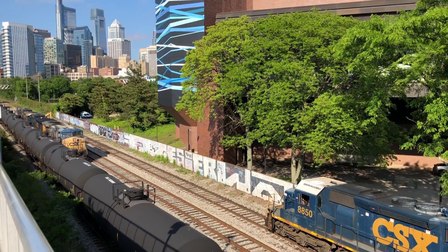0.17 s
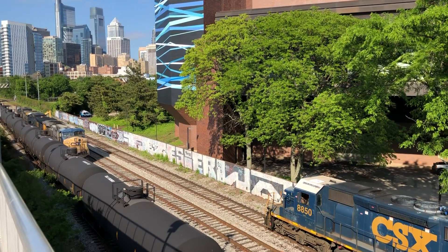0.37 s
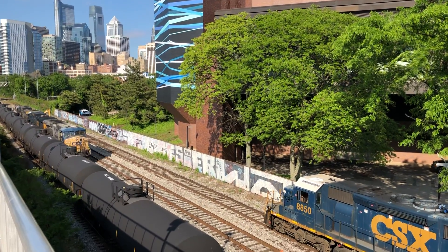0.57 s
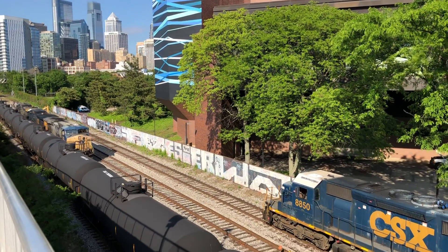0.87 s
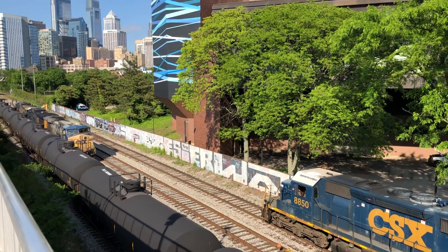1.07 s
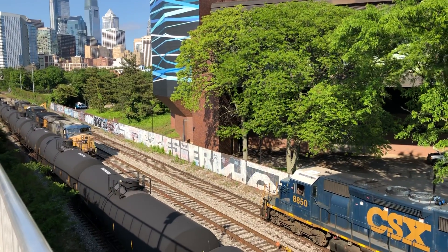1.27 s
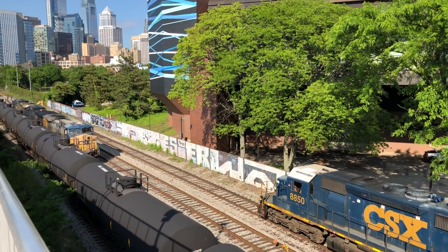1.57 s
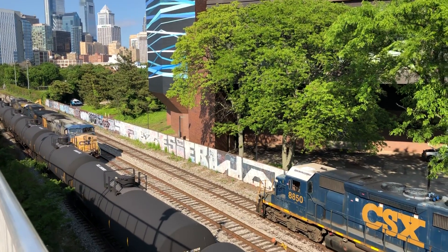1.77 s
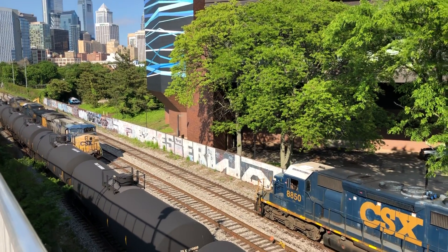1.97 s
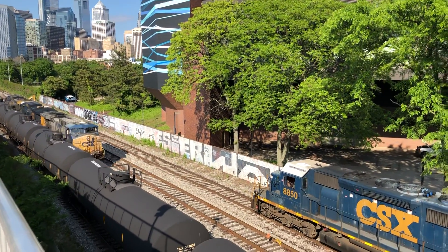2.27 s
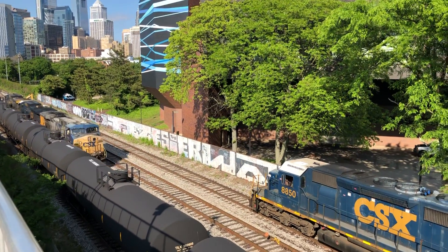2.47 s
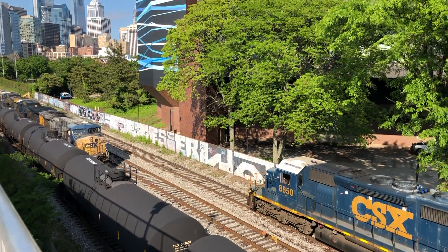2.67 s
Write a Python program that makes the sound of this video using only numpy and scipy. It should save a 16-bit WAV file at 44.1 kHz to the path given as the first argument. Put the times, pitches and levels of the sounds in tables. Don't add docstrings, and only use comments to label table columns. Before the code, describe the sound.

A continuous diesel locomotive drone heard outdoors from a bridge: deep uneven pulsing, metallic gear tones, fan noise and faint city wash, with a wavering whistle-like whine and irregular dull wind bumps on the phone.

```python
import sys
import numpy as np
from scipy import signal
from scipy.fft import rfft, irfft
from scipy.io import wavfile
from scipy.ndimage import uniform_filter1d, map_coordinates

SR = 44100
rng = np.random.default_rng(int(sys.argv[2]) if len(sys.argv) > 2 else 0)


def natural_amplitude(level_db):
    exponent = np.asarray(level_db, float) / 20
    return 10 ** exponent


def store_wav(level_fs):
    pcm = np.round(np.clip(np.atleast_2d(level_fs), -1, 1) * 32767)
    wavfile.write(sys.argv[1], SR, pcm.T.astype(np.int16))


N = 124803
T = np.arange(N) / SR

# shaft speed in Hz, crank position at the start in turns, exhaust pipe lag in turns,
# stack smear in turns per squared order, stack twist in turns per cubed order.
NEAR = (5.243, .5225, .76, .125, .0125)
FAR = (5.312, .1933, .337, -.02, .0167)


def level(x, db):
    return x * natural_amplitude(db) / np.sqrt(np.mean(np.abs(x) ** 2))


def band(x, hz, width):
    return signal.lfilter(*signal.iirpeak(hz, hz / width, SR), x)


def walk(rate):
    hold = max(int(SR / rate), 1)
    steps = np.repeat(rng.standard_normal(N // hold + 1), hold)[:N]
    smooth = uniform_filter1d(uniform_filter1d(steps, hold), hold)
    return smooth / smooth.std()


def curve(rows):
    return np.interp(T, *np.array(rows, float).T[:2])


def crank(hz):
    speed_rise_per_s = .00025
    return hz * (T + speed_rise_per_s * ((T - T.mean()) ** 2 - T.var()) / 2)


def exhaust(engine, orders):
    cylinders, shake_db, shake_hz = 16, .6, 2
    hz, start, lag, smear, twist = engine
    turn = crank(hz) + start
    out = 0
    for order, db in orders:
        off = order - cylinders
        phase = order * turn + lag + smear * off ** 2 + twist * off ** 3
        out = out + natural_amplitude(db + shake_db * walk(shake_hz)) * np.cos(2 * np.pi * phase)
    return out


def clatter(hz, strong):
    # frequency in Hz, peak level in dB.
    lesser = [(100, -42), (250, -49.5), (500, -51), (900, -63), (1500, -60)]
    size = 2 ** 12
    f, db = np.array(lesser).T
    order = np.arange(size // 2 + 1)
    chance = rng.standard_normal((2, len(order)))
    envelope = natural_amplitude(np.interp(np.log(order * hz + 1), np.log(f), db) - 4.5)
    spectrum = (chance[0] + 1j * chance[1]) * envelope
    spectrum[(order * hz < f[0]) | (order * hz > f[-1])] = 0
    for ringing, peak_db in strong:
        spectrum[ringing] *= natural_amplitude(peak_db) / abs(spectrum[ringing])
    one_turn = irfft(spectrum) * size / 2
    return map_coordinates(one_turn, [crank(hz) % 1 * size], mode="grid-wrap")


def gears():
    # tone in Hz, peak level in dB, sideband below in dB, sideband above in dB, phase of the once-a-
    # turn swell within the turn in turns. The 1507.7 Hz row is the second sideband below the 1518.3 Hz tooth
    teeth = [(690.4, -44, -20, -20, .1), (756.5, -41, -14, -8, .1), (1479.7, -47, -20, -20, 0),
             (1518.3, -40.5, -4, -20, 0), (1507.7, -51, -20, -20, 0), (1585.4, -51, -20, -20, 0),
             (2095.5, -40, -14, -24, .44), (2269.5, -57, -9, -9, .4), (2707.1, -55, -20, -20, .1),
             (2769.5, -37.5, -24, -14, .14), (2811.7, -53, -20, -20, .1), (3020.8, -55, -1, -9, .1),
             (3398, -61, -9, -9, 0), (3586.7, -59, -9, -9, 0), (3650, -59, -9, -9, 0),
             (3777.5, -57, -9, -9, 0)]
    wander, swell_db = .00012, .3
    out, turn = 0, crank(NEAR[0])
    for hz, db, below, above, at in teeth:
        swing = np.exp(2j * np.pi * (turn + at))
        drift = np.cumsum(hz * wander * walk(1.734)) / SR
        phase = crank(hz) + drift + rng.random()
        sidebands = natural_amplitude(below) / swing + natural_amplitude(above) * swing
        tone = np.exp(2j * np.pi * phase) * (1 + sidebands)
        out = out + natural_amplitude(db + swell_db * walk(4.45)) * tone.real
    return out


def turbo():
    # offset from the blade tone in Hz, level in dB.
    strand_rows = [(-120, -13), (-85, -10), (-44, -1), (0, 0), (45, -6), (-20, -8)]
    harmonics_db = [-39, -57.5, -69]
    # time in seconds, level in dB.
    load_rows = [(0.0, -48.5), (0.06, -45), (0.69, -48.5), (0.79, -51), (0.83, -45.5), (0.9, -49),
                 (1.44, -45), (1.46, -46.5), (2.43, -48.5), (2.47, -40), (2.58, -51), (2.83, -46)]
    blade_hz, wander_hz, wander_rate, turn_wobble_hz = 4474, 6, 12, 7
    rough, fade_db, skirt_db, skirt_hz = .35, 2., -6, 220

    turn = 2 * np.pi * crank(NEAR[0])
    drift = wander_hz * (walk(wander_rate / 2) + walk(wander_rate * 3) / 2)
    common = blade_hz + drift + turn_wobble_hz * np.cos(turn - 2.4)
    phases = []
    for hz, _ in strand_rows:
        phases.append(2 * np.pi * np.cumsum(common + hz + wander_hz * walk(wander_rate)) / SR)
    load = curve(load_rows)
    out = 0
    for k, db in enumerate(harmonics_db, 1):
        strands = 0
        for (_, strand_db), phase in zip(strand_rows, phases):
            hoarse = 1 + rough * (walk(40 * k) + 1j * walk(40 * k))
            fade = natural_amplitude(strand_db + fade_db * walk(8.24))
            strands = strands + fade * (np.exp(1j * k * phase) * hoarse).real
        skirt = rng.standard_normal(N)
        for _ in range(2):
            skirt = band(skirt, k * (blade_hz - 40), skirt_hz * k)
        harmonic = level(strands, db) + level(skirt, db + skirt_db)
        out = out + harmonic * natural_amplitude((load - load.mean()) / k)
    pulsing = (1 + .17 * np.cos(turn - 2.5)) * (1 + .07 * np.cos(2 * turn + .7))
    whistle = level(band(rng.standard_normal(N), 5840, 87), -50.5)
    return out * pulsing + whistle * (1 + .3 * np.cos(turn + 2.0))


def wash():
    # frequency in Hz, level in dB per Hz.
    rumble = [(40, 1.5), (85, 2), (130, -6.5), (220, -7), (330, -14.5), (800, -9.5), (1100, -16.5),
              (2000, -20)]
    hiss = [(3300, -24), (4800, -24.5), (6200, -32.5), (7300, -36), (9500, -43.5), (11700, -48),
            (12600, -51), (16000, -61)]
    swell_db, flicker_db = .25, .8
    out, swell = 0, walk(2.7)
    f, db = np.array(rumble + hiss, float).T
    bins = np.arange(N // 2 + 1) * SR / N + 1
    shape = natural_amplitude(np.interp(np.log(bins), np.log(f), db))
    for step in range(19):
        bell = np.cos(np.clip(np.log2(bins / 32) * 2 - step, -1, 1) * np.pi / 2)
        noise = irfft(rfft(rng.standard_normal(N)) * shape * bell, N)
        out = out + noise * natural_amplitude(swell_db * swell + flicker_db * walk(9.12))
    turn = 2 * np.pi * crank(NEAR[0])
    chug = 1 + .05 * np.cos(turn + 1.0) + .06 * np.cos(2 * turn + .3)
    return level(out * chug, -26.5)


def breeze():
    # time in seconds, peak level in dB, frequency in Hz.
    thumps = [(0.129, -17.5, 220), (0.384, -13.5, 220), (0.398, -43, 220), (0.72, -19, 209),
              (0.76, -18.5, 212), (0.938, -30, 220), (1.183, -19, 220), (1.299, -20, 220),
              (1.337, -14.5, 218), (1.75, -16.5, 227), (2.039, -19, 220), (2.15, -25, 220),
              (2.232, -13.5, 217), (2.588, -15, 218), (2.669, -18.5, 220), (2.801, -19, 220)]
    # time in seconds, level in dB.
    strength = [(0, -37), (.13, -30), (.25, -55), (.38, -23), (.5, -56), (.74, -28), (.9, -46), (1.33, -40),
                (1.6, -31), (2.2, -35.5), (2.4, -29.5), (2.65, -27), (2.83, -38)]
    thump_trim_db, thump_cycles, gust_s = -2, 0.89, 0.024
    eddies_per_s, scatter_db, eddy_hz = 90, 3, 150

    out = np.zeros(N)
    flutter = rng.standard_normal(N)
    for _ in range(3):
        flutter = band(flutter, 166, 300)
    flutter = level(flutter, -9.5)
    for s, db, hz in thumps:
        u = (T - s) * hz - thump_cycles
        bump = np.exp(-(2 * u / thump_cycles) ** 2) * np.cos(2 * np.pi * u)
        out += natural_amplitude(db + thump_trim_db) * bump
        out += natural_amplitude(db) * np.exp(-((T - s) / gust_s) ** 2) * flutter
    chance = rng.random((3, N))
    strikes = (chance[0] < eddies_per_s / SR) * np.sign(chance[1] - .5)
    eddies = strikes * natural_amplitude(-scatter_db * np.log(chance[2] + 0.016))
    small = level(band(band(eddies, eddy_hz, 240), eddy_hz, 350), 0)
    return out + small * natural_amplitude(curve(strength))


def scene():
    # crank order, peak level in dB.
    near_orders = [(8, -41), (9, -39), (10, -42), (13, -30), (15, -24), (16, -28), (17, -25), (20, -40),
                   (23, -40), (24, -40), (31, -35), (32, -41)]
    far_orders = [(8, -34), (9, -38), (13, -39), (14, -41), (15, -27), (16, -35), (17, -31), (19, -42),
                  (21, -37)]
    # crank order, peak level in dB.
    block_orders = [(49, -39), (50, -40), (56, -44), (79, -39), (80, -40), (82, -45), (98, -44), (104, -46),
                    (128, -47), (134, -46), (145, -47), (157, -47), (160, -46), (237, -42)]
    engines = exhaust(NEAR, near_orders) + exhaust(FAR, far_orders)
    engines = engines + clatter(NEAR[0], block_orders) + natural_amplitude(-1) * clatter(FAR[0], [])
    low_cut = signal.butter(8, 44, "high", fs=SR, output="sos")
    tones = gears() + turbo()
    return (engines + tones + signal.sosfilt(low_cut, wash() + breeze()))[None]


def low_pass(x):
    return signal.sosfilt(signal.butter(12, 15710, fs=SR, output="sos"), x)


def record(dry):
    return low_pass(dry)


dry = scene()
out = record(dry)
store_wav(out)
```